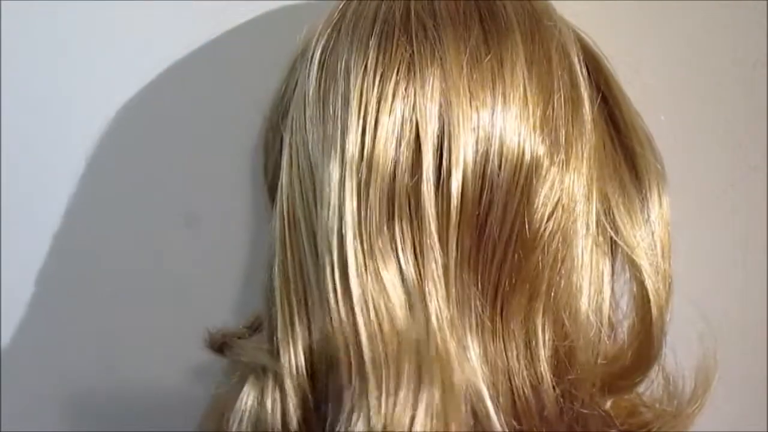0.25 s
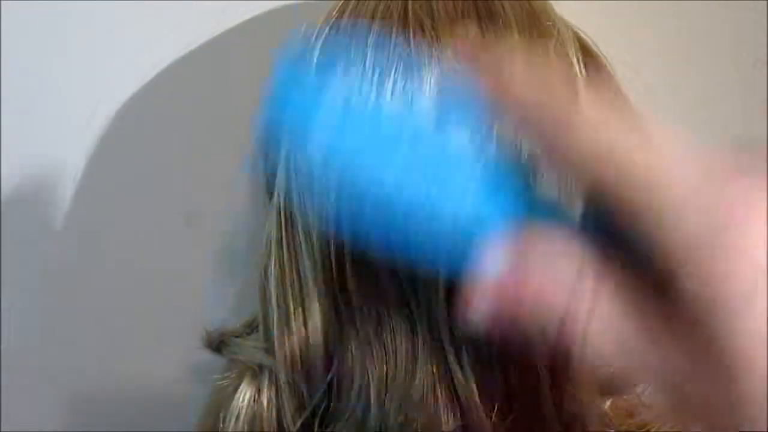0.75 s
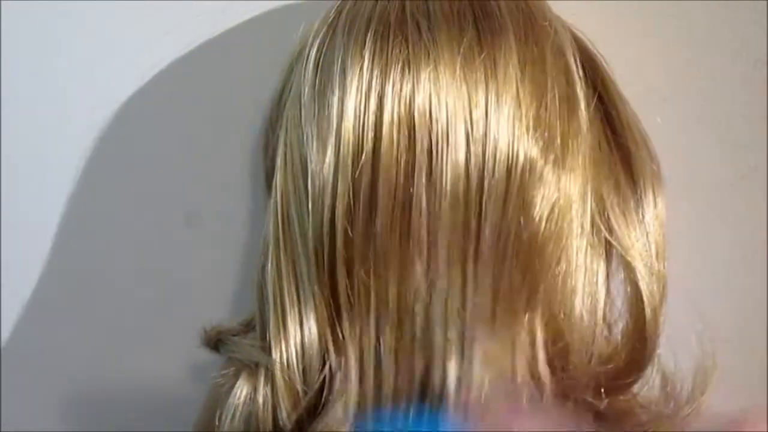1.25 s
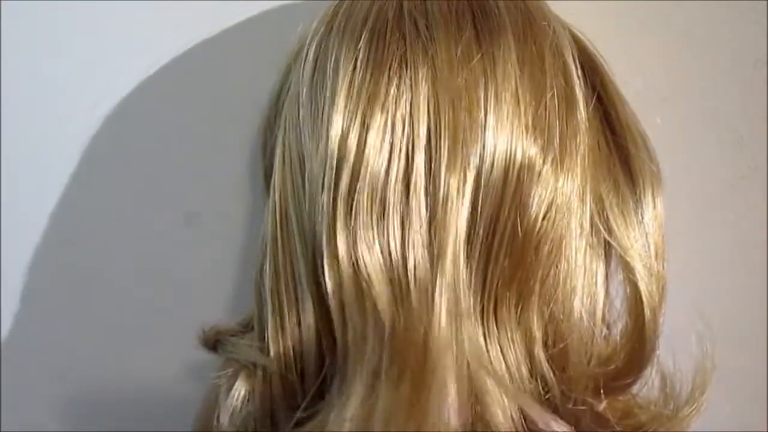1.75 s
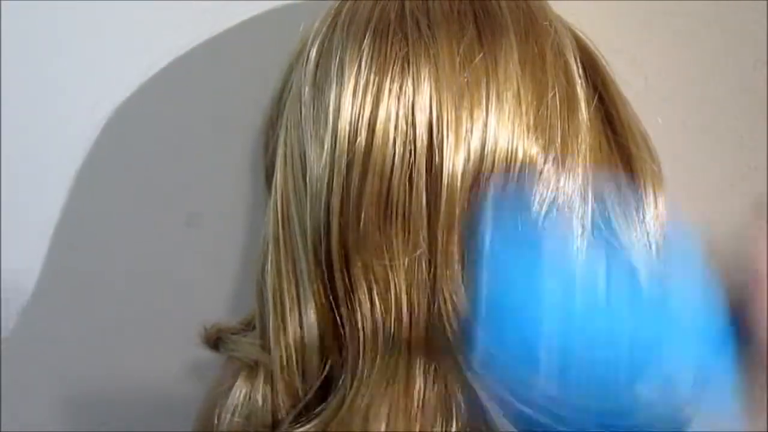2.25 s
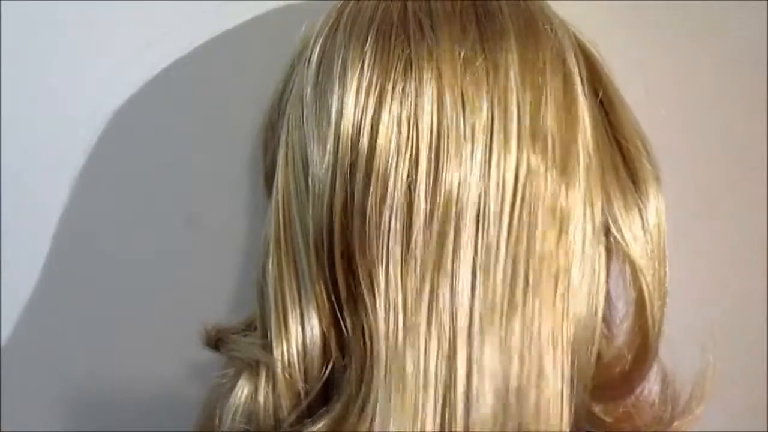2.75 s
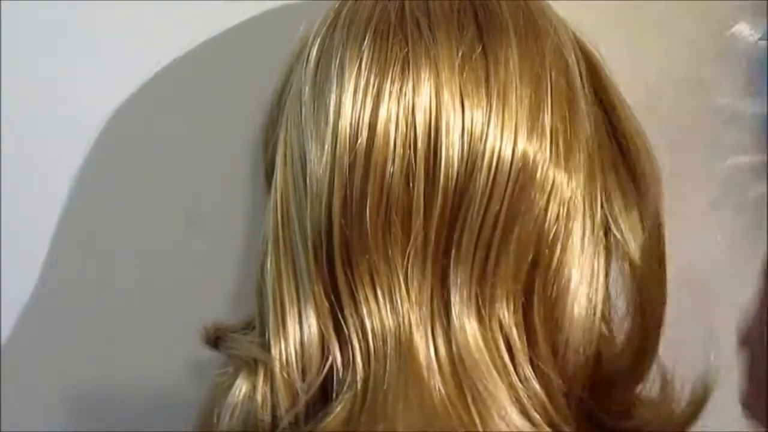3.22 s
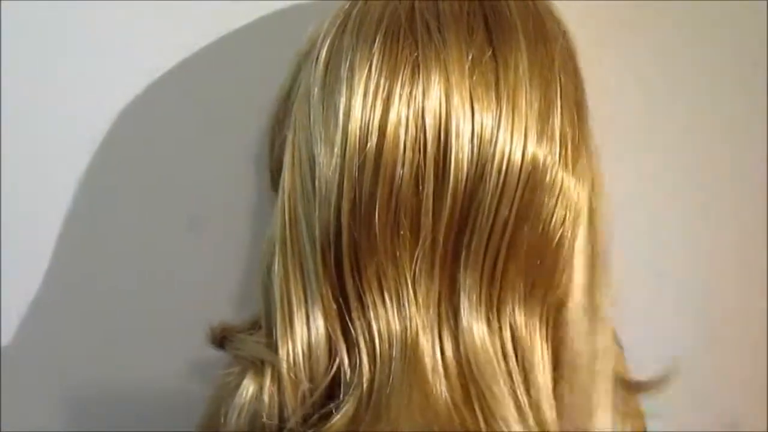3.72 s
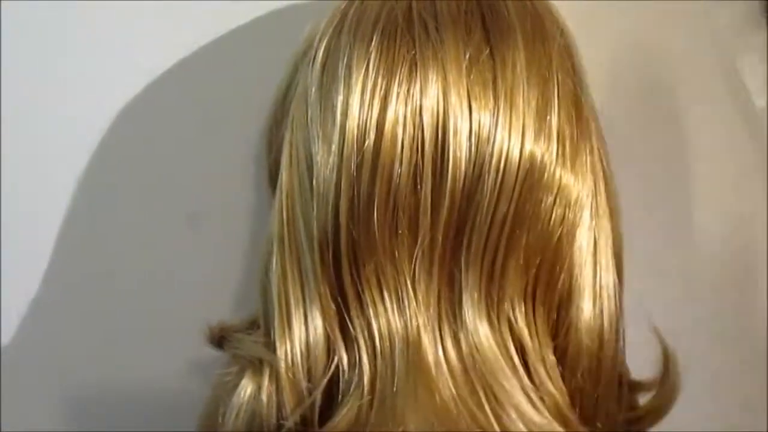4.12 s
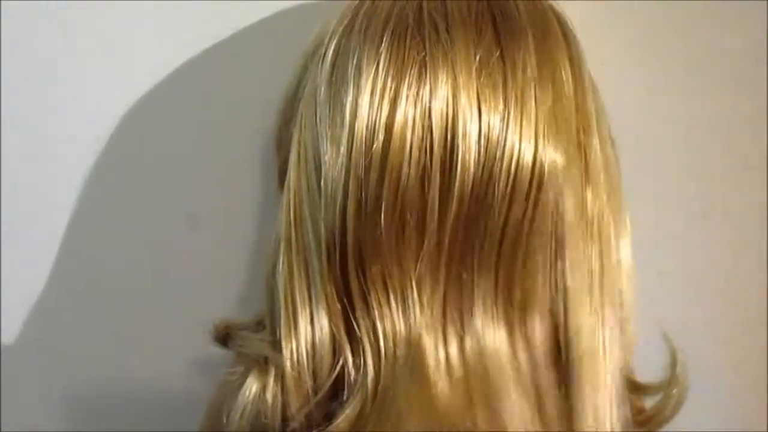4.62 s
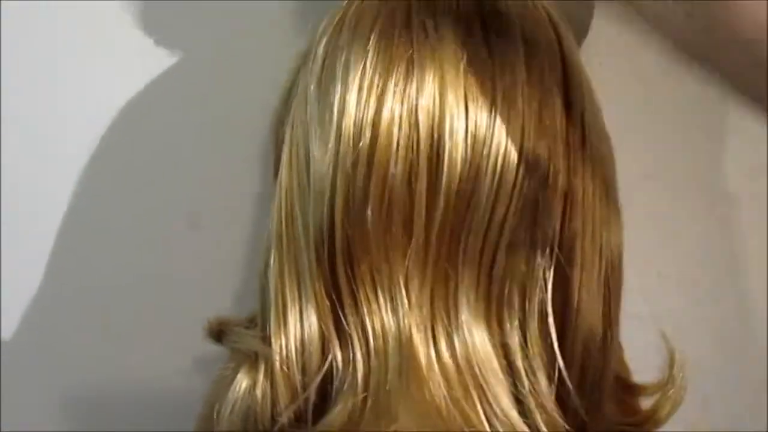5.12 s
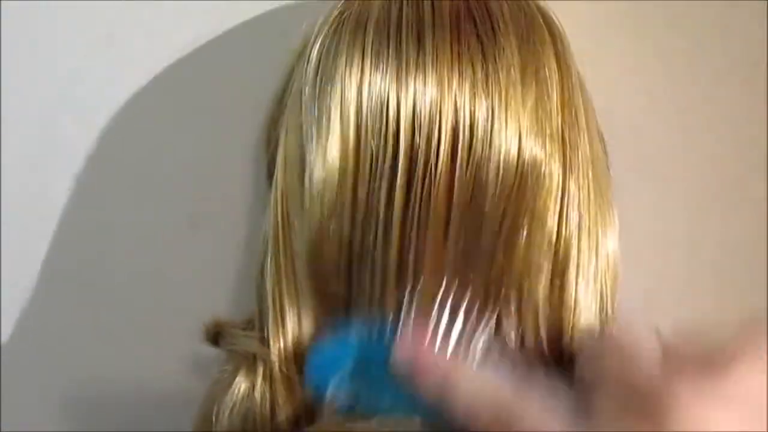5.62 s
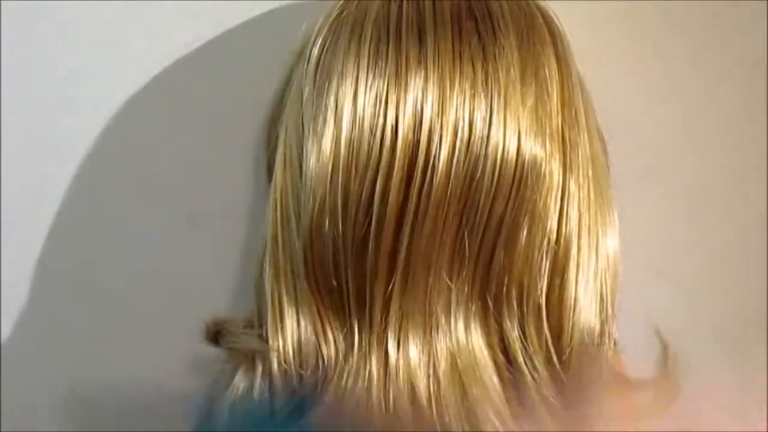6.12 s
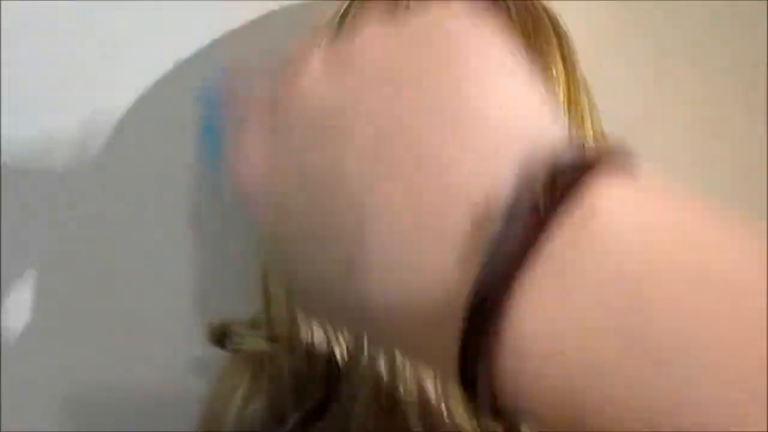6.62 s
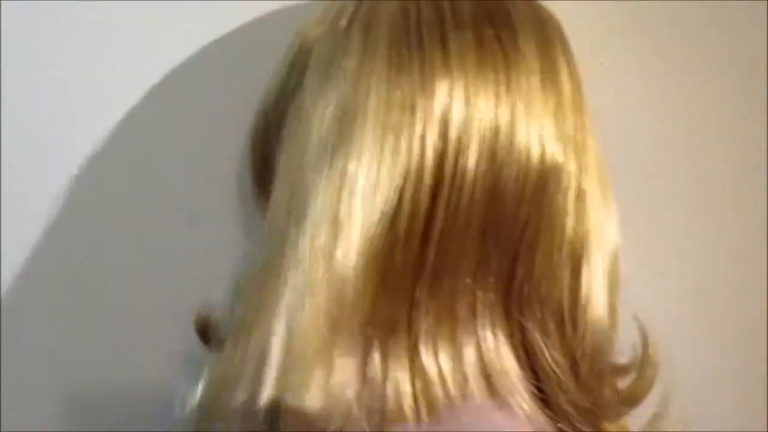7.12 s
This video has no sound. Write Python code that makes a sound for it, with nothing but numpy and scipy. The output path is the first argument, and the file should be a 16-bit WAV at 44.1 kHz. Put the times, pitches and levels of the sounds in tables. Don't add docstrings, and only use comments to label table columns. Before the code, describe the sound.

Thin, dry swishes of pins through plastic hair come in uneven bursts, mixed with tiny snaps and springy ticks. Two hard brush knocks and one hollow stand clunk stand out far above the quiet brushing. Soft fingertip taps and low bumps accompany the tugs. Late on, a metal clink comes before a knot tears loudly. Close microphone in a small quiet indoor space with faint machine hum.

```python
import sys
import numpy as np
from scipy import signal
from scipy.fft import rfft, irfft
from scipy.io import wavfile

SR = 44100
rng = np.random.default_rng(int(sys.argv[2]) if len(sys.argv) > 2 else 0)


def persist_wave(psi):
    counts = np.round(np.clip(psi, -1, 1) * 32767).astype(np.int16)
    wavfile.write(sys.argv[1], SR, np.atleast_2d(counts).T)


def nominal_scale(level):
    x = np.asarray(level, float) / 20
    return 10 ** x


N = 324576
ROOM_T60_S = 0.21


def rms_one(x):
    return x / np.sqrt(np.mean(x ** 2) + 1e-20)


def band(x, low_hz, high_hz, order=2):
    return signal.sosfilt(signal.butter(order, [low_hz, high_hz], "band", fs=SR, output="sos"), x)


def peak(x, hz, width_hz):
    r = np.exp(-np.pi * width_hz / SR)
    top = np.array([1, 0, -1]) * (1 - r * r) / 2
    return signal.lfilter(top, [1, -2 * r * np.cos(2 * np.pi * hz / SR), r * r], x)


def ring(force, hz, t60):
    r = nominal_scale(-60 / (t60 * SR))
    w = 2 * np.pi * hz / SR
    return signal.lfilter([0, np.sin(w)], [1, -2 * r * np.cos(w), r * r], force)


def colour(x, spectrum):
    hz, db = np.transpose(spectrum)
    bins = np.fft.rfftfreq(len(x), 1 / SR) + 1
    return irfft(rfft(x) * nominal_scale(np.interp(np.log(bins), np.log(hz), db)), len(x))


def drift(rate):
    r = np.exp(-2 * np.pi * rate / SR)
    wander = signal.lfilter([1], [1, -2 * r, r * r], rng.standard_normal(N + SR))
    return rms_one(wander[SR:])


def add(out, at_s, sound):
    start = round(at_s * SR)
    out[start:start + len(sound)] += sound[:N - start]


def grains(per_s, spread_db):
    sizes = nominal_scale(spread_db * np.minimum(rng.exponential(1, N), 5))
    signs = rng.choice([-1, 1], N)
    return sizes * signs * (rng.random(N) < per_s / SR)


def arches(spells, peaks_db, sag_db, rest_db):
    touch_s = 0.027
    t = np.arange(0, N + 64, 64) / SR
    power = nominal_scale(2 * rest_db)
    for (start, top, end), db in zip(spells, peaks_db):
        touch = np.clip(np.minimum(t - start, end - t) / touch_s, 0, 1)
        sag = np.interp(t, [start, top, end], [sag_db, 0, sag_db])
        power = power + touch * nominal_scale(2 * (db - sag))
    return np.interp(np.arange(N) / SR, t, 10 * np.log10(power))


# frequency in Hz, width in Hz, level in dB.
PINS = [(4450, 220, -0.5), (5300, 460, -1.5), (6000, 240, -.6), (6680, 400, -1.5), (7360, 380, -1)]
# start in seconds, fastest moment in seconds, end in seconds,
# pin swish in dB, strand hiss in dB.
STROKES = [(-.05, .09, .2, -65, -73), (0.237, .37, 0.4, -63.5, -77), (.79, .82, 0.93, -72, -82),
           (.97, 1.008, 1.1, -65.5, -74), (1.055, 1.15, 1.22, -69, -70.5), (1.22, 1.36, 1.51, -62.5, -73),
           (1.448, 1.55, 1.63, -66.5, -75), (1.68, 1.725, 1.77, -69, -78), (1.884, 2.0, 2.04, -63.5, -73.5),
           (2.503, 2.6, 2.66, -60, -67.5), (2.645, 2.77, 2.9, -59, -68), (2.878, 2.93, 3.05, -63, -74),
           (3.547, 3.68, 3.75, -62.5, -67), (3.74, 3.838, 3.93, -66, -70), (4.364, 4.484, 4.56, -61, -67.5),
           (4.53, 4.6, 4.7, -58, -66), (4.66, 4.72, 4.82, -68, -75), (5.215, 5.23, 5.27, -62, -68),
           (5.26, 5.366, 5.57, -60.5, -71.5), (5.5, 5.64, 5.8, -62.5, -66),
           (5.721, 5.878, 5.99, -61.5, -74), (6.54, 6.7, 6.8, -66.5, -74.5), (6.88, 7.05, 7.18, -62, -73.5),
           (7.06, 7.26, 7.4, -61.5, -74.5)]


def strokes():
    pulls = np.array(STROKES)
    spells, swish_db, hiss_db = pulls[:, :3], pulls[:, 3], pulls[:, 4]
    pin_db = arches(spells, swish_db, sag_db=8.0, rest_db=-84.5)
    air_db = arches(spells, hiss_db, sag_db=7.5, rest_db=-85)
    drag_db = arches(spells, swish_db + 1.5, sag_db=10.5, rest_db=-69.5)
    clump = drift(29)

    pins = sum(nominal_scale(db + 2.4 * drift(9)) * peak(grains(1600, 3.6), hz, width) for hz, width, db in PINS)
    pins = signal.sosfilt(signal.butter(3, 7900, fs=SR, output="sos"), pins)
    air = band(grains(5000, 2.6), 7000, 11300) * nominal_scale(1.3 * clump)
    drag = band(grains(2500, 2.5), 230, 1650) * nominal_scale(1.5 * clump)
    scratch = band(grains(600, 3.2), 810, 4400) * nominal_scale(2.4 * clump)

    swish = nominal_scale(pin_db - 0.5 + 0.8 * clump) * rms_one(pins)
    hiss = nominal_scale(air_db + 0.9) * rms_one(air)
    pull = nominal_scale(drag_db - 0.3) * rms_one(drag)
    return swish + hiss + pull + nominal_scale(air_db + 3.0) * rms_one(scratch)


def crackle(table, side_band, sharpness, snap, t60):
    snap_delay_s, creak_db = .001, -12
    out, t = np.zeros(N), np.arange(SR // 8) / SR
    shape = np.where(t < snap_delay_s, nominal_scale(creak_db), nominal_scale(-60 * t / t60))
    for s, db, hz, side_db in table:
        noise = rng.standard_normal(len(t))
        burst = noise * np.abs(noise) ** 0.6 * shape
        burst[round(snap_delay_s * SR)] = -snap
        centre = band(peak(burst, hz, hz / sharpness), 0.3 * hz, 1.5 * hz)
        centre = centre / np.max(np.abs(centre))
        side = band(burst, *side_band)
        side = side / np.max(np.abs(side))
        add(out, s, nominal_scale(db + 2.2) * (centre + nominal_scale(side_db + 1.5) * side))
    return out


# start in seconds, peak in dB, centre in Hz, dull part in dB.
SNAGS = [(1.0615, -46, 1310, -10), (1.3019, -48, 1200, -6), (1.4724, -49, 1320, -2), (2.5344, -52, 1200, 9),
         (2.5955, -42, 1900, 3), (2.6907, -26, 2000, -8), (2.7177, -33.5, 2780, -7),
         (2.8225, -48.5, 1360, -11), (3.0006, -38, 1410, -23), (3.5289, -52, 1320, -6),
         (3.536, -51, 1330, -6), (3.543, -52, 1300, -6), (3.5957, -49, 1280, 2), (3.6651, -47, 2320, -7),
         (3.7763, -51, 1510, 1), (4.4159, -45, 2650, -9), (4.433, -46, 2500, -9), (4.4608, -31, 2600, -12),
         (4.4655, -42, 2500, -3), (4.4765, -41, 2600, -2), (4.4834, -40, 2670, -1), (4.4875, -45, 2800, -8),
         (4.4944, -40.5, 2440, -6), (4.499, -48, 1700, -3), (4.5065, -51, 1500, -3),
         (4.5655, -40.5, 1190, -4), (4.571, -44, 1100, -5), (4.582, -45, 2000, -3), (4.602, -41, 2050, 1.5),
         (4.607, -48, 1200, -3), (4.6137, -44, 2050, -4), (5.23, -46, 2870, -9), (5.3512, -44, 2400, -11),
         (5.386, -48, 2100, -12), (5.3991, -37, 2150, -25), (5.449, -43, 1700, -15), (5.47, -46, 4400, -12),
         (5.5004, -41, 1600, -17), (5.528, -40.5, 2940, -14), (5.59, -49, 3000, -10),
         (5.8326, -42, 1400, -10), (5.855, -50, 1500, -8)]


def snags():
    return crackle(SNAGS, (300, 1200), sharpness=3.2, snap=18.0, t60=0.036)


# start in seconds, peak in dB, centre in Hz, dull part in dB.
KNOT = [(6.4899, -42.5, 1260, -9), (6.5715, -48.5, 2400, -12), (6.6159, -22, 2940, -24),
        (6.622, -34, 2900, -20), (6.637, -39, 2700, -15), (6.645, -42, 2600, -12), (6.6562, -21, 2900, -20),
        (6.662, -32, 2900, -18), (6.6782, -22, 2800, -14), (6.6845, -35, 1400, -10),
        (6.9182, -49, 1370, -2), (6.9397, -47, 1320, 6.5), (6.9455, -41, 600, -3), (6.9536, -44, 2700, 8)]


def knot():
    return crackle(KNOT, (250, 1100), sharpness=1.4, snap=15.0, t60=0.045)


# start in seconds, peak in dB, centre in Hz, bright part in dB.
TICKS = [(1.0114, -49, 4290, -19), (1.061, -37, 3800, -25), (1.2284, -58, 3860, 4), (1.27, -47, 4500, 1.5),
         (2.5242, -53, 5040, -11), (2.595, -38.5, 4810, -16), (2.6155, -39, 4900, -16),
         (2.6767, -40.5, 7250, -14), (2.6908, -29.5, 3750, -14), (2.7167, -29.5, 6860, -18),
         (2.8225, -44, 5090, -26), (3.0004, -51, 3850, -16), (3.5284, -50, 4660, -23),
         (3.5628, -49, 4670, -21), (4.3774, -50, 5930, -13), (4.4832, -47, 5230, -19),
         (4.4942, -51, 4450, -15), (4.5648, -40.5, 3570, -15), (4.574, -44, 4900, -15),
         (4.582, -42, 4300, -15), (4.6012, -32, 5500, -26), (4.6134, -40, 5510, -23),
         (4.617, -43, 4800, -20), (4.6274, -45, 5100, -22), (4.632, -44, 5300, -22),
         (4.637, -42, 5000, -22), (5.23, -50, 5360, -11), (5.35, -48, 5500, -20), (5.3994, -42, 5960, -22),
         (5.4505, -48, 4360, -18), (5.5285, -39, 4670, -14), (6.4822, -50, 4300, -14),
         (6.6159, -30, 5000, -5), (6.6563, -29, 4900, -14), (6.6782, -29, 4300, -14),
         (6.9526, -55, 5260, -19)]


def pin_ticks():
    return crackle(TICKS, (6500, 12500), sharpness=3.0, snap=16.0, t60=0.038)


# start in seconds, peak in dB, centre in Hz, dull part in dB.
SLIPS = [(1.065, -47, 1300, -2), (1.274, -49, 1900, -10), (2.543, -48, 1100, -3), (2.604, -45, 4900, -8),
         (2.62, -46, 1700, 1.5), (2.6945, -35, 2300, -8), (2.7005, -38, 2800, -6), (2.7045, -41, 4200, -6),
         (2.7215, -36, 3200, -6), (3.538, -47, 4700, -20), (3.541, -49, 3700, -20),
         (5.4535, -44, 1300, -10), (5.459, -48, 5900, -20), (5.4795, -48, 4200, -20),
         (6.027, -40, 337, -20), (6.6595, -30, 4900, -22), (6.6815, -30, 4300, -20)]


def slips():
    return crackle(SLIPS, (300, 1200), sharpness=3.5, snap=14.0, t60=0.036)


# start in seconds, end in seconds, level in dB, from Hz, to Hz.
ZIP = (5.692, 5.74, -51.5, 500, 1902)


def zip_free():
    out = np.zeros(N)
    start, end, db, from_hz, to_hz = ZIP
    glide = np.linspace(from_hz, to_hz, round((end - start) * SR))
    rough = rms_one(band(rng.standard_normal(SR // 8), 20, 300))[:len(glide)]
    tone = np.sin(2 * np.pi * np.cumsum(glide) / SR)
    add(out, start, nominal_scale(db) * rough * tone * signal.windows.tukey(len(glide), .5))
    return out


def strike(modes, tail, touches, contact_s, chatter, tail_db, low_t60, high_t60, sign):
    t = np.arange(SR // 3) / SR
    push = np.zeros(len(t))
    for delay, db in touches:
        since = np.maximum(t - delay, 0)
        push += nominal_scale(db) * since * np.exp(-since / contact_s)
    force = (1 + chatter * rng.standard_normal(len(t))) * push

    body = np.zeros(len(t))
    for k, (hz, db, t60) in enumerate(modes):
        rung = ring(force, hz, t60)
        body += sign ** k * nominal_scale(db) * rung / np.max(np.abs(rung))

    noise = rms_one(colour(rng.standard_normal(len(t)), tail)) * (1 - np.exp(-t / .0008))
    low = signal.sosfilt(signal.butter(2, 1500, fs=SR, output="sos"), noise)
    dying = low * nominal_scale(-60 * t / low_t60) + (noise - low) * nominal_scale(-60 * t / high_t60)
    wash = nominal_scale(-20 - 60 * t / ROOM_T60_S) * noise
    sound = body + wash + nominal_scale(tail_db) * dying
    return signal.sosfilt(signal.butter(3, 150, "high", fs=SR, output="sos"), sound)


# start in seconds, level in dB.
KNOCKS = [
    (.4474, -15),
    (2.1078, -14),
]
# frequency in Hz, first knock in dB, second knock in dB, decay t60 in seconds.
BRUSH = [(160, -14, -9, .05), (231, -2.5, -5.5, .11), (326, -11, -20, .07), (492, -17, -24, 0.076),
         (800, -13, -8, .05), (1011, -12, -7.5, 0.057), (1448, -3, -1.5, .035), (1130, -17, -10, 0.035),
         (1990, 3, -5, .035), (2200, -8, -6, .035), (2570, -4, -7, 0.033), (3430, -12, -11, 0.024),
         (5550, -19, -15, 0.05)]
# frequency in Hz, level in dB per Hz.
KNOCK_TAIL = [(88, -18), (170, -3), (287, -4), (620, -19), (1400, -8), (1750, -16), (2300, -10),
              (3770, -24), (5200, -22), (15800, -54)]
# delay in seconds, level in dB.
BRUSH_TOUCHES = [
    [(0, -2), (.0018, -1), (.0052, -5)],
    [(0, -3), (.0026, -1), (.0072, -6)],
]


def brush_knocks():
    out = np.zeros(N)
    for k, (s, db) in enumerate(KNOCKS):
        modes = [(hz, levels[k], t60) for hz, *levels, t60 in BRUSH]
        blow = strike(modes, KNOCK_TAIL, BRUSH_TOUCHES[k], contact_s=0.00012, chatter=.35,
                      tail_db=-8, low_t60=.11, high_t60=0.081, sign=-1.004)
        add(out, s, nominal_scale(db) * blow)
    return out


# start in seconds, end in seconds, level in dB, centre in Hz.
REBOUND = (2.13, 2.171, -33.5, 1200)


def brush_drag():
    out, t = np.zeros(N), np.arange(SR // 5) / SR
    start, end, db, hz = REBOUND
    slide_s = end - start
    rough = grains(5000, 1.7)[:len(t)]
    modes = sum(nominal_scale(level + 12) * peak(rough, f, 120) for f, _, level, _ in BRUSH[4:])
    scrape = rms_one(band(rough + modes, hz / 2.4, hz * 1.8, order=3))
    scrape = scrape + nominal_scale(-13) * rms_one(peak(rough[::-1], 5600, 400))
    after = np.maximum(t - slide_s, 0)
    swell_db = 9.2 * np.minimum(t / slide_s - 1, 0)
    add(out, start, nominal_scale(db) * scrape * nominal_scale(swell_db - 60 * after / 0.03))
    add(out, start, nominal_scale(db - 13) * scrape[::-1] * nominal_scale(-60 * after / 0.2))
    return out


# frequency in Hz, level in dB, decay t60 in seconds.
STAND = [(203, -17, .08), (280, -18, 0.12), (378, -0.4, .11), (484, -7.5, .1), (582, 1.5, .1),
         (715, -12, .13), (823, -2.5, .08), (905, -8, .11), (993, -8, .1), (1100, -14, .1), (1307, -8, .08),
         (1600, -16, 0.08), (2150, -16, .04), (2630, -19, .05)]
# frequency in Hz, level in dB per Hz.
STAND_TAIL = [(59, -46), (110, -31), (375, -3), (620, -2), (1300, -10), (2200, -16), (3000, -25),
              (9660, -47), (15000, -80)]
# delay in seconds, level in dB.
STAND_TOUCHES = [
    (0, 0),
    (.0045, -10),
    (.0098, -6),
    (.0215, -14),
    (.038, -17),
]


def stand_knock():
    out = np.zeros(N)
    blow = strike(STAND, STAND_TAIL, STAND_TOUCHES, contact_s=.0001, chatter=.3,
                  tail_db=-4.5, low_t60=0.13, high_t60=.09, sign=1)
    add(out, 3.4206, -nominal_scale(-14) * blow)
    return out


# frequency in Hz, level in dB, decay t60 in seconds.
CLINK = [(1970, -1.5, 0.043), (2455, -9, 0.046), (3590, -5, 0.056), (4045, -6, .05), (4355, -0.4, .07),
         (4856, -1, .04), (5400, -5, .05), (5825, -9, 0.06), (7343, -9, .05), (9049, -12, .05),
         (9755, -18, .06), (12840, -14, .03), (13450, -6, .07), (15240, -14, .07)]
# frequency in Hz, level in dB per Hz.
CLINK_TAIL = [(150, -30), (250, -2), (386, -4), (475, -19), (1420, -10), (1600, -11), (2470, -7.5),
              (3200, -20.5), (4770, -3.5), (7360, -15.5), (8030, -18), (12600, -20), (13800, -12),
              (15800, -25)]


def pin_clink():
    out = np.zeros(N)
    blow = strike(CLINK, CLINK_TAIL, [(0, 0)], contact_s=.0012, chatter=3.5,
                  tail_db=3.2, low_t60=0.098, high_t60=0.11, sign=-1.055)
    add(out, 6.0216, nominal_scale(-36) * blow)
    return out


# start in seconds, rise in seconds, level in dB, decay t60 in seconds, top in Hz.
RATTLES = [
    (.4395, 0.0016, -29, 0.065, 14000),
    (.462, 0.0095, -43, 0.13, 15000),
    (2.1074, 0.0018, -36.5, 0.045, 8000),
    (2.135, 0.022, -47, 0.14, 10000),
]


def pin_rattles():
    out, t = np.zeros(N), np.arange(SR // 5) / SR
    for start, rise, db, t60, top_hz in RATTLES:
        shiver = rms_one(band(colour(rng.standard_normal(len(t)), CLINK_TAIL), 2800, top_hz, order=1))
        decay = nominal_scale(-60 * np.maximum(t - rise, 0) / t60)
        add(out, start, nominal_scale(db) * shiver * np.minimum(t / rise, 1) * decay)
    return out


def thuds(table, push_cycles, lead_s, t60):
    out = np.zeros(N)
    for s, db, hz in table:
        push = np.hanning(round(push_cycles * SR / hz))
        push = push * np.sin(2 * np.pi * hz * np.arange(len(push)) / SR)
        rung = ring(np.r_[push, np.zeros(SR // 3)], hz, t60)
        add(out, s - lead_s, nominal_scale(db - 0.5) * rung / np.max(np.abs(rung)))
    return out


# start in seconds, peak
# in dB, frequency in Hz.
TAPS = [(2.435, -38, 221), (2.48, -42.5, 226), (3.269, -49, 197), (3.535, -45, 280), (4.019, -50, 210),
        (4.259, -37.5, 222), (4.299, -46, 220), (4.337, -35, 225), (4.744, -45.5, 218), (4.979, -48, 191),
        (5.166, -35, 228), (6.023, -39, 225), (6.952, -39, 205)]


def finger_taps():
    return thuds(TAPS, push_cycles=3.3, lead_s=.007, t60=.1)


# start in seconds, peak in dB, frequency in Hz.
JOLTS = [(0.186, -32.5, 53.6), (0.806, -41.5, 56.5), (1.023, -37.5, 40.4), (1.07, -45, 115),
         (1.48, -42, 75.4), (2.559, -32, 53), (2.592, -31.5, 69.6), (2.629, -38, 130), (2.944, -36.5, 70.0),
         (4.404, -38, 64), (4.489, -35.5, 89), (4.628, -39.5, 70.0), (5.226, -34.5, 70.0),
         (6.147, -36.5, 100), (6.484, -21, 73.5), (6.487, -35, 136), (6.539, -25.5, 56), (6.649, -27.5, 65),
         (6.69, -40, 130), (6.699, -32, 40)]


def stand_jolts():
    return thuds(JOLTS, push_cycles=1.18, lead_s=-0.0021, t60=0.2)


# start in seconds, strongest moment in seconds, end in seconds, level in dB.
ROCKING = [
    (-.05, .15, .45, -56),
    (.95, 1.1, 1.55, -57),
    (2.48, 2.58, 2.8, -53),
    (2.95, 3.1, 3.4, -57),
    (3.5, 3.8, 3.9, -52.5),
    (4.3, 4.53, 4.6, -51.5),
    (5.248, 5.45, 5.9, -46.5),
    (5.95, 6.15, 6.25, -53),
    (6.5, 6.64, 7.1, -48.5),
]


def stand_sway():
    rocks = np.array(ROCKING)
    sway_db = arches(rocks[:, :3], rocks[:, 3], sag_db=7.0, rest_db=-57.5)
    sway = band(rng.standard_normal(N), 41.0, 109.4) * nominal_scale(2.6 * drift(7.7))
    return nominal_scale(sway_db) * rms_one(sway)


def room(x):
    t = np.arange(SR // 3) / SR
    tail = band(rng.standard_normal(len(t)), 140, 8700, order=1) * nominal_scale(-60 * t / ROOM_T60_S) * (t > .004)
    return signal.fftconvolve(x, tail / np.sqrt(np.sum(tail ** 2)))[:N]


# frequency in Hz, level in dB per Hz.
ROOM_TONE = [(12, -33), (20, -3), (44, -1), (86, -11), (172, -12), (976, -22.5), (1810, -28.5),
             (3250, -32.5), (4200, -35.5), (6540, -38.5), (11400, -47), (16000, -61)]


def room_hush():
    hush = colour(rng.standard_normal(N), ROOM_TONE)
    return hush / np.std(band(hush, 145, 16000)) * nominal_scale(-57.5 - 0.5)


# frequency in Hz, width in Hz, level in dB.
HUMS = [
    (26.99, 1.5, -54),
    (60, 11.2, -58),
    (121.1, 13, -63),
]


def machine_hum():
    hums = np.zeros(N)
    for hz, width, db in HUMS:
        noise = rng.standard_normal(N + SR)
        hums += nominal_scale(db) * rms_one(peak(peak(noise, hz, width), hz, width)[SR:])
    mains = np.sqrt(2) * np.sin(2 * np.pi * 119.3 * np.arange(N) / SR)
    return hums + nominal_scale(-60 + 1.6 * drift(3.0)) * mains


SQUEAKS_S = [.94, 1.84, 2.29, 2.47, 3.13, 3.32, 3.85, 4.15, 4.29, 4.66, 4.83, 6.11, 6.26, 6.42]


def far_squeak():
    hz, width_hz, length_s = 3200, 40, .07
    squeak = peak(peak(rng.standard_normal(N), hz, width_hz), hz, width_hz)
    gate = np.zeros(N)
    for s in SQUEAKS_S:
        add(gate, s - length_s / 2, np.hanning(round(length_s * SR)))
    return nominal_scale(-73) * gate * rms_one(squeak)


def scene():
    sharp = snags() + knot() + pin_ticks() + zip_free()
    hair = strokes() + sharp + slips() + nominal_scale(-18) * room(sharp)
    blows = brush_knocks() + brush_drag() + stand_knock() + pin_clink() + pin_rattles()
    low = finger_taps() + stand_jolts() + stand_sway()
    background = room_hush() + machine_hum() + far_squeak()
    return (hair + blows + low + background)[None]


def roll_off(x):
    return signal.sosfilt(signal.butter(12, 16440, fs=SR, output="sos"), x)


def record(dry):
    x = dry - peak(dry, 7800, 71)
    x = x + nominal_scale(-81.5) * rms_one(band(rng.standard_normal(N), 5000, 18000))
    x = signal.sosfilt(signal.cheby2(16, 50, 16400, fs=SR, output="sos"), x)
    return roll_off(x)


dry = scene()
out = record(dry)
persist_wave(out)
```